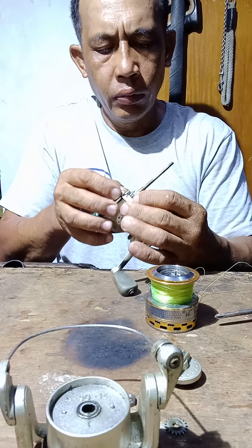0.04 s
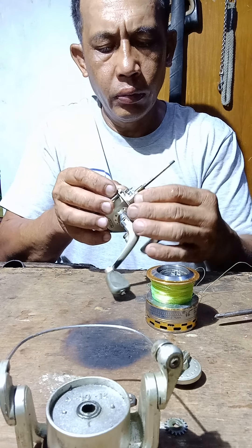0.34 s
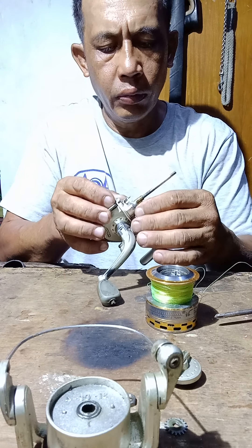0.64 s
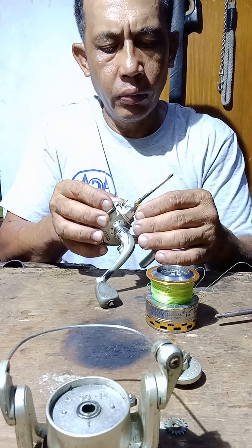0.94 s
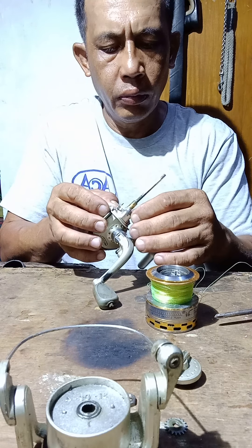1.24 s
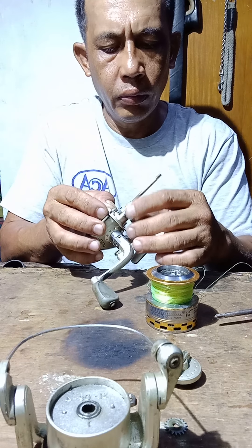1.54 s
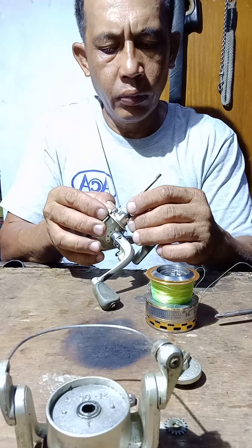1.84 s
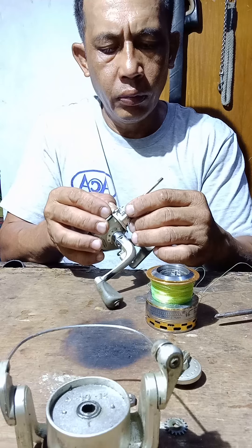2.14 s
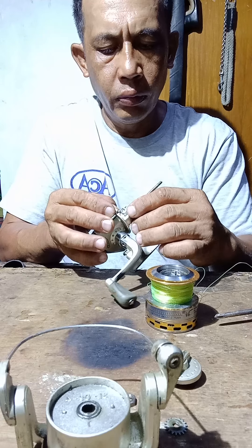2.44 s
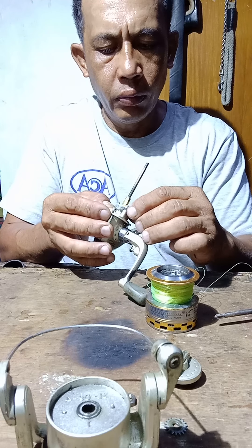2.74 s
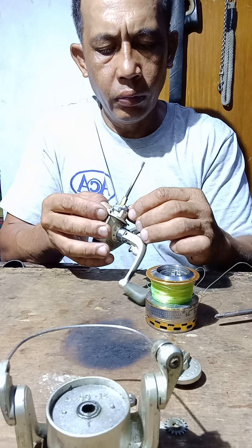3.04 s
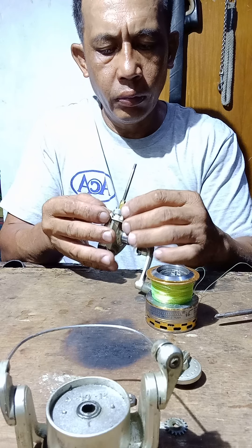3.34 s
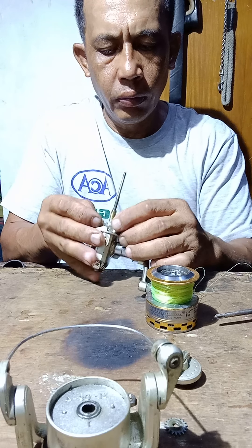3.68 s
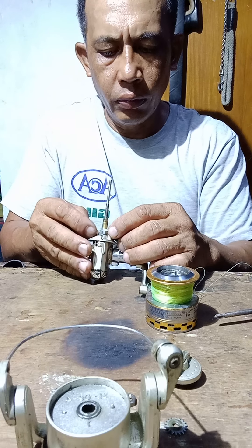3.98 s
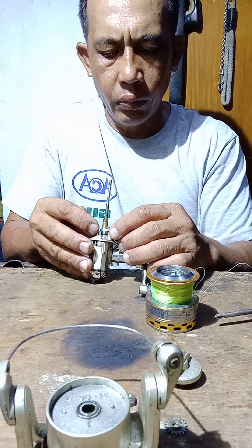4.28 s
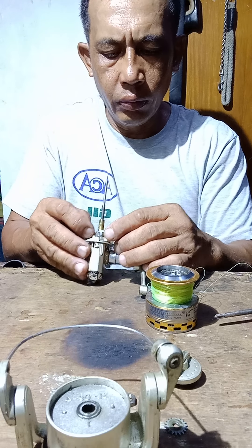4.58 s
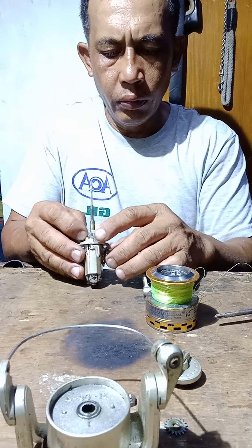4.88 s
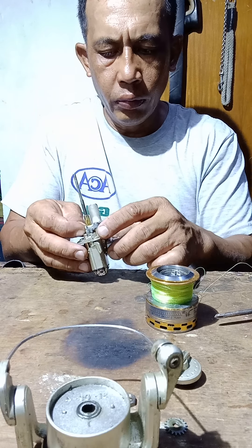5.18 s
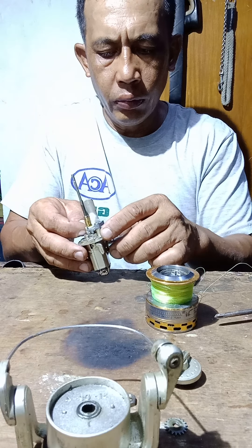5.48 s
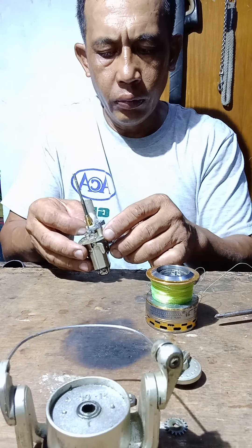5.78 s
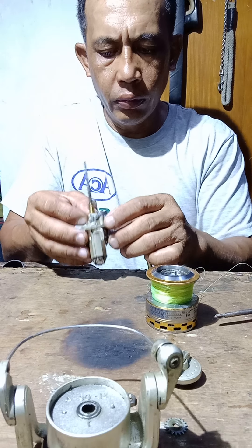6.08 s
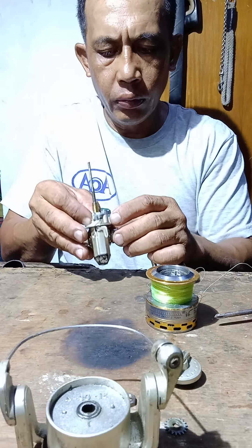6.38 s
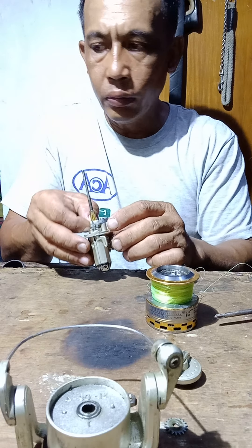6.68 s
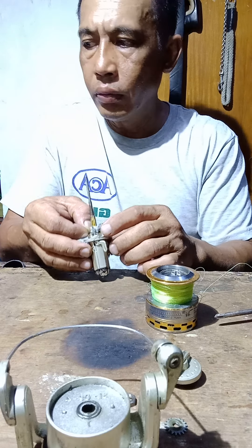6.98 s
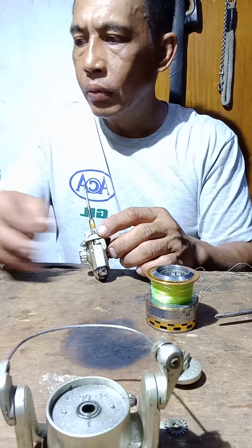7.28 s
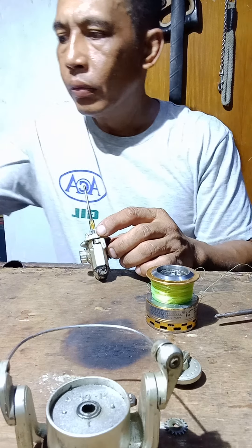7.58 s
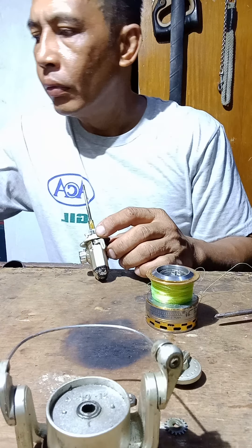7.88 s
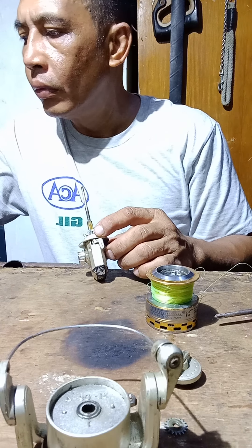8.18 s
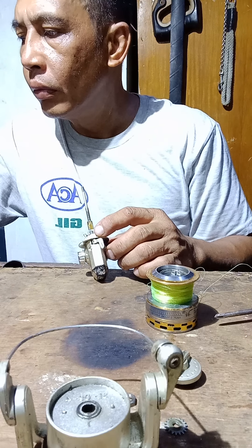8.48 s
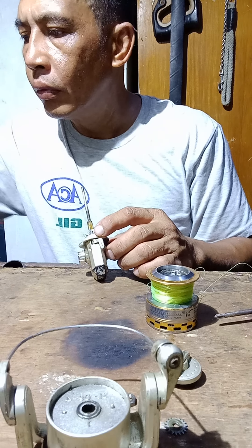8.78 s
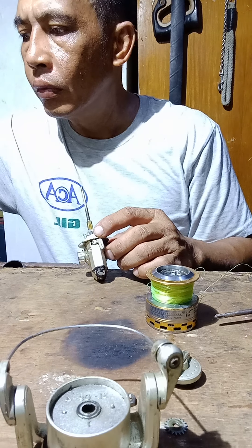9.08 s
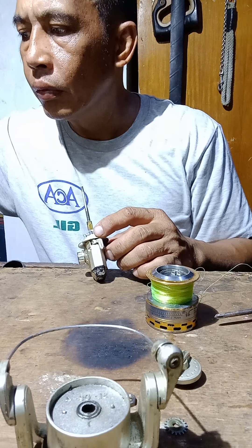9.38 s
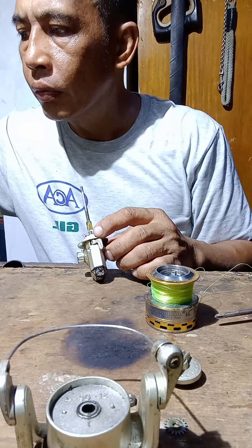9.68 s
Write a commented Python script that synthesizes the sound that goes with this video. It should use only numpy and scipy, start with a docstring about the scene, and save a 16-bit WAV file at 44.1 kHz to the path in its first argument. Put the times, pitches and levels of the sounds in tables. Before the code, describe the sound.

Two crickets, one near and high, one fainter and lower, chirp about nine times a second throughout, over a faint low night murmur on a half-open porch. From the start, fingers softly rub a hollow fishing reel, with slight table bumps and a dull forearm brush around 0.6 seconds. The rubbing grows after 3 seconds. At 3.8 seconds the reel skids briefly and lands with a hard knock that makes the wooden table ring. A softer thud follows at 4.6 seconds, more rubbing near 5, and another bump at 7.1. At 7.7 seconds a tool knocks in a box slightly to the left, and a hand rustles quietly inside. From 9.2 seconds to about 9.7, tools clatter, drag and scrape loudly, shaking the box. The sound is close, heard by a phone on the table.

```python
"""On a half-open porch, over a low night-time murmur, two crickets chirp throughout by stridulation.
From the first moment a man's fingers rub a fishing reel, exciting its hollow housing; it bumps the
wooden table, and his forearm brushes the edge. Near 3.8 s the reel skids and lands hard, and the table
rings in its normal modes. From 7.7 s he gropes in a box of tools, which knock and, after 9 s, drag
and scrape. A phone on the table hears it all and lowers its gain after loud peaks."""
import sys
import numpy as np
from scipy import signal
from scipy.fft import rfft, irfft, next_fast_len
from scipy.io import wavfile
from scipy.ndimage import uniform_filter1d, minimum_filter1d, map_coordinates

SR = 44100
rng = np.random.default_rng(int(sys.argv[2]) if len(sys.argv) > 2 else 0)


def unload_audio(sound):
    """Save the sound as a 16-bit wav file, at the path given as the first command line argument."""
    columns = np.transpose(np.atleast_2d(sound))
    # keep every value between -1 and 1, then stretch to whole-number steps
    steps = np.round(np.clip(columns, -1, 1) * 32767)
    wavfile.write(sys.argv[1], SR, steps.astype(np.int16))


N = 429093
T = np.arange(N) / SR

# Levels are relative; a spectrum gives only the shape of a noise.
# spectrum of the distant murmur: frequency_hz, density_db
NIGHT_SPECTRUM = [(25, -15), (50, -9), (90, 5.5), (140, -2), (240, 2.5), (400, -10), (700, -20),
                  (1100, -26.5), (1600, -34.5), (3000, -29.5), (4600, -36.5), (8500, -46.5), (15000, -43.5)]
# each cricket's pace, about nine chirps a second with slight hesitations: time_s, chirp_count
NEAR_PACE = [(.008, 0), (.672, 6), (1.416, 13), (2.534, 23), (3.504, 32), (4.499, 41), (6.332, 58),
             (6.56, 60), (7.425, 68), (7.843, 72), (8.176, 75), (8.417, 77), (8.57, 78), (9.308, 85),
             (9.54, 87), (9.75, 89)]
FAR_PACE = [(.08, 0), (1.91, 16), (2.39, 20), (3.29, 28), (4.31, 37), (5.68, 49), (7.04, 61), (8.83, 77),
            (9.73, 85)]
# wing strokes of one chirp, timed from its middle: offset_s, length_s, start_hz, end_hz, level_db
NEAR_STROKES = [(-.045, .019, 6800, 6450, -15), (-.030, .025, 7100, 6500, -5.5),
                (-.011, .020, 7250, 6400, 0), (.003, .025, 7050, 6500, -9)]
FAR_STROKES = [(-.040, .016, 5900, 5500, -12), (-.025, .016, 5900, 5450, -5), (-.009, .016, 5950, 5400, 0),
               (.006, .016, 5850, 5400, -3)]
# radiation from the wings, favouring the tone and its octave: frequency_hz, gain_db
WING_RESPONSE = [(4600, -2.5), (5400, -2), (7500, -1.5), (8400, -10), (9700, -11.5), (11000, 8.5),
                 (12700, 1), (14100, -6.5), (15000, -21.5)]
# fingers sliding on the reel: start_s, length_s, hiss_db, ring_db
FINGER_RUBS = [(.043, .15, -72, -71), (0.544, 0.16, -71.5, -76), (1.44, .19, -72.5, -97),
               (1.877, 0.16, -99, -64.5), (2.526, 0.24, -65.5, -72.5), (2.873, 0.33, -69, -72.5),
               (3.191, 0.12, -57, -56.5), (3.266, 0.176, -62.5, -58), (3.687, 0.18, -52.5, -55.5),
               (4.839, .13, -55, -49.5), (4.954, 0.13, -59, -51), (5.579, 0.23, -70, -77),
               (6.93, 0.15, -89, -69.5), (7.278, 0.093, -57, -66)]
# spectra of the fingers' hiss and the reel's hollow housing: frequency_hz, density_db
HISS_SPECTRUM = [(500, -9), (1000, -4.5), (1400, -15.5), (1850, -2.5), (2250, -13), (3150, 1), (3700, -5.5),
                 (4400, -3.5), (5000, -9.5), (8500, -15.5), (11500, -12), (15500, -20.5)]
HOUSING_SPECTRUM = [(500, -19), (800, -5), (1000, 5.5), (1180, -12.5), (1500, -19.5), (1830, -11.5),
                    (2150, -29.5), (3100, -17.5), (5200, -35)]
# reel and hands striking the table: start_s, level_db, highpass_hz, lowpass_hz
TABLE_BUMPS = [(.074, -41.5, 69, 288), (.569, -34, 59, 169), (3.8015, -4.5, 79.8, 1998),
               (4.578, -30, 71, 131), (4.592, -24, 96.5, 160), (7.069, -27, 474, 474),
               (7.070, -23.5, 85, 138)]
# modes of the table top, with the reel's thin metal ping above: pitch_hz, level_db, t60_s
TABLE_MODES = [(84.2, -6.5, 0.19), (137, 0.5, 0.21), (219.6, -8, 0.29), (247.5, -9, 0.28), (287, -7, 0.22),
               (372, -3, 0.16), (407, 0, 0.12), (467, 3, 0.11), (624, -6, 0.092), (770, -11, 0.15),
               (940, -7.5, 0.069), (1247.6, -4.5, 0.061), (1430, 0.5, 0.048), (1860, -9.5, 0.052),
               (5510, -11, .05), (11470, -4.5, 0.33)]
# the table's dense modes and the porch around it: frequency_hz, density_db, t60_s
TABLE_TAIL = [(49.73, -5.5, .35), (120, 1, 0.52), (340, -4.5, 0.37), (690, -4.5, 0.17), (1280, -1, 0.098),
              (2200, -12, 0.17), (3100, -16, 0.22), (5000, -9, .11), (7600, -15.5, .16), (15130, -3.5, 0.4)]
# a forearm brushing the table's edge: start_s, length_s, level_db
ARM_BRUSHES = [(.6, 0.51, -51.5), (1.3, 0.45, -60.5), (4.86, 0.076, -45), (7.26, 0.13, -53),
               (7.95, 0.38, -54.5)]
# the reel skidding as it is set down: start_s, length_s, level_db
REEL_SKIDS = [(3.738, .055, -40.5), (4.565, 0.1, -49.5)]
# spectra of the brushing and the skidding: frequency_hz, density_db
BRUSH_SPECTRUM = [(50, -10), (110, 8.5), (240, 9.5), (450, -8.5), (900, -53)]
SKID_SPECTRUM = [(400, -5), (900, -1), (1500, 0), (2200, -7), (3200, -16), (5000, -18), (9000, -30)]
# the hand feeling about in the box: start_s, length_s, level_db
GROPES = [(7.7, 0.3, -65.5), (7.93, 0.75, -60)]
# spectrum of its friction: frequency_hz, density_db
GROPE_SPECTRUM = [(500, -4.5), (950, 7), (1500, -8.5), (2400, -6), (3200, 2.5), (4000, -6.5), (5600, -2.5),
                  (8500, -7), (11400, -2), (12500, -7), (15500, -14)]
# tools striking the box: start_s, level_db, lowpass_hz
TOOL_KNOCKS = [(7.7301, -20.5, 930), (9.209, -28.5, 2530), (9.280, -6.5, 1142), (9.319, -14.5, 1990),
               (9.329, -5, 304), (9.361, -6, 378), (9.373, -3, 345), (9.431, -17, 1400), (9.5007, -5, 1110),
               (9.540, -6, 1940), (9.678, -3.5, 790)]
# modes of the box: pitch_hz, level_db, t60_s
BOX_MODES = [(240, -10, 0.18), (306.4, -5, 0.075), (354, -38, 0.058), (522, 0, 0.043), (510.6, 6, 0.041),
             (853, -12.5, 0.014), (1204, -1, 0.024), (2100, -10.5, 0.083), (2432, -11.5, 0.05),
             (3054, -15.5, 0.053)]
# the box's dense modes and the porch around it: frequency_hz, density_db, t60_s
BOX_TAIL = [(59.7, -34, .2), (161, 11, 0.069), (317, 13.5, 0.24), (555, 4.5, 0.28), (830, 5.5, 0.17),
            (1170, -3, 0.25), (2310, 1.5, 0.17), (5300, -4.5, 0.29), (9000, -1, 0.18),
            (14800, -12.5, 0.069)]
# envelopes of tools dragged in the box: time_s, rumble_db, scrape_db
DRAG_LEVELS = [(9.169, -59, -76), (9.191, -36, -59), (9.269, -32, -47), (9.285, -22, -30.5),
               (9.335, -18.5, -34.5), (9.40, -24.5, -42), (9.46, -30, -42.5), (9.57, -28, -45),
               (9.62, -32.5, -51.5), (9.73, -34, -54)]
# spectra of the shaken box and the scraping tools: frequency_hz, density_db
RUMBLE_SPECTRUM = [(30, -27), (90, -2), (170, -9.5), (280, 3), (520, -4), (750, -13.5), (1300, -16.5),
                   (2500, -42.5)]
SCRAPE_SPECTRUM = [(500, -5), (1200, -3.5), (2500, 3), (4000, -11), (8500, -14), (12000, -13.5),
                   (15500, -11.5)]
# share of the sound that differs between the two microphones: frequency_hz, side_minus_mid_db
STEREO_WIDTH = [(100, -11.5), (280, -18.5), (600, -6), (1300, 0.5), (4000, -0.5), (15000, 1.5)]
# the left microphone, shaded in the middle range, favoured at the top: frequency_hz, left_minus_right_db
MIC_SHADING = [(60, -1), (250, -4), (550, -5.5), (1100, -8), (2000, -5), (3500, -9.5), (5600, -14),
               (6800, -9), (8000, -1.5), (9500, 4), (14000, 3)]


def undb(db):
    """Amplitude ratio for a level in decibels."""
    return 10 ** (np.asarray(db) / 20)


def unit(x):
    """Normalisation to an RMS of one."""
    return x / np.sqrt(np.mean(x ** 2))


def pan(db):
    """Left and right gains for a level difference."""
    return undb(np.array([[db], [-db]]) / 2)


def on_log(hz, points, column=1):
    """Interpolation of a table column along a log-frequency axis."""
    points = np.array(points, float)
    return np.interp(np.log(np.maximum(hz, 1)), np.log(points[:, 0]), points[:, column])


def colour(x, spectrum):
    """Filtering by multiplication in the frequency domain."""
    n = x.shape[-1]
    size = next_fast_len(n)
    gain = undb(on_log(np.fft.rfftfreq(size, 1 / SR), spectrum))
    return irfft(rfft(x, size) * gain, size)[..., :n]


def butterworth(x, hz, kind):
    """A filter with a maximally flat passband."""
    return signal.sosfilt(signal.butter(2, hz, kind, fs=SR, output="sos"), x)


def stereo_noise(n):
    """Spatial coherence: noise is alike on both sides in the bass and unrelated in the treble."""
    mid, side = rng.standard_normal((2, n))
    side = colour(side, STEREO_WIDTH)
    return np.array([mid + side, mid - side])


def walk(rate_hz, n=N):
    """Smooth random fluctuation with a spread near one."""
    knots = rng.standard_normal(int(n / SR * rate_hz) + 2)
    return map_coordinates(knots, [np.arange(n) * rate_hz / SR], order=2, mode="nearest")


def add(out, x, start_s):
    """Superposition of x on out from start_s on."""
    i = int(start_s * SR)
    a, b = max(i, 0), min(i + x.shape[-1], out.shape[-1])
    if b > a:
        out[..., a:b] += x[..., a - i:b - i]


def night_murmur():
    """Slow amplitude modulation makes a low, distant noise swell gently."""
    return undb(-58 + 1.1 * walk(2.7)) * unit(colour(stereo_noise(N), NIGHT_SPECTRUM)) * pan(-.8)


def stridulation(pace, strokes, scatter_db, teeth_rad, jitter_rad, octave_db):
    """Each wing stroke drags a scraper over a file: a falling tone, phase-modulated by uneven teeth."""
    time_s, count = np.transpose(pace)
    chirps_s = np.interp(np.arange(count[-1] + 1), count, time_s)
    chirps_db = scatter_db * rng.standard_normal(len(chirps_s))
    out = np.zeros(N)
    for offset_s, length_s, start_hz, end_hz, level_db in strokes:
        n = int(length_s * SR)
        glide = 2 * np.pi * np.cumsum(np.linspace(start_hz, end_hz, n)) / SR
        glide += teeth_rad * walk(960, n)  # the same teeth in every chirp
        swell = np.sin(np.linspace(0, np.pi, n))
        for chirp_s, chirp_db in zip(chirps_s, chirps_db):
            # no two strokes catch the file at quite the same moment or speed
            phase = glide + .8 * rng.standard_normal() + jitter_rad * walk(1200, n)
            tone = np.sin(phase) + undb(octave_db) * np.sin(2 * phase + 1.7 * walk(860, n))
            start_s = (int(chirp_s * SR) + int(offset_s * SR) + .5) / SR
            add(out, undb(chirp_db + level_db) * swell * tone, start_s)
    return colour(out, WING_RESPONSE)


def porch(x, wet_db, t60_s, wall_db):
    """Reflection: a slap off the nearest wall, then different diffuse echoes at each microphone."""
    wall_lag = int(.01017 * SR)
    early = x + undb(wall_db) * np.pad(x, (wall_lag, 0))[:N]
    t = T[:SR // 2]
    echoes = rng.standard_normal((2, len(t))) * undb(-60 * t / t60_s)
    wet = signal.fftconvolve(early[None], echoes, axes=1)[:, :N]
    return unit(unit(early) + undb(wet_db) * np.array([unit(side) for side in wet]))


def crickets():
    """Independent rhythms: a near, high cricket and a fainter, lower one drift in and out of step."""
    near = stridulation(NEAR_PACE, NEAR_STROKES,
                        scatter_db=.5, teeth_rad=.41, jitter_rad=.55, octave_db=-28.5)
    near = porch(near, wet_db=1, t60_s=.37, wall_db=-10.5)
    far = stridulation(FAR_PACE, FAR_STROKES,
                       scatter_db=2.1, teeth_rad=.25, jitter_rad=.35, octave_db=-28)
    far = porch(far, wet_db=0, t60_s=.25, wall_db=-14)
    return (undb(-47.5) * near + undb(-65) * far) * pan(.4)


def friction(spectrum, rate_hz, rough_db):
    """Stick-slip friction: surfaces catch and release, giving noise in uneven spurts."""
    return unit(colour(stereo_noise(N) * undb(rough_db * walk(rate_hz)), spectrum))


def slides(events, spectrum, rough_db):
    """Friction noise swells and fades with the contact pressure of each short movement."""
    pressure = sum(undb(level_db) * np.sin(np.pi * np.clip((T - start_s) / length_s, 0, 1))
                   for start_s, length_s, level_db in events)
    return pressure * friction(spectrum, rate_hz=180, rough_db=rough_db)


def finger_rubs():
    """Resonance: fingertips hiss over the reel's metal and excite its hollow housing."""
    start_s, length_s, hiss_db, ring_db = np.transpose(FINGER_RUBS)
    hiss = slides(zip(start_s, length_s, hiss_db), HISS_SPECTRUM, rough_db=2.5)
    ring = slides(zip(start_s, length_s, ring_db), HOUSING_SPECTRUM, rough_db=3.5)
    return hiss + ring


def struck_body(modes, tail, tail_db, crack_db, crack_t60_s):
    """Impulse response: a short crack, damped modes and a tail with its own decay in each band."""
    t, ring = T[:SR // 3], 0
    for hz, level_db, t60_s in modes:
        # treble modes reach the two microphones further out of phase than bass modes
        skew = np.arctan(undb(on_log(hz, STEREO_WIDTH))) * rng.choice([-1, 1]) * np.array([[1], [-1]])
        sign = rng.choice([-1, 1])  # set by the spot that is struck
        ring = ring + sign * undb(level_db - 60 * t / t60_s) * np.sin(2 * np.pi * hz * t + skew)
    noise, wash = stereo_noise(len(t)), 0
    for hz in 50 * 2 ** np.arange(0, 8.5, .5):  # half-octave bands
        band = butterworth(noise, [hz / 2 ** .25, hz * 2 ** .25], "band")
        wash = wash + band * undb(on_log(hz, tail) - 60 * t / on_log(hz, tail, column=2))
    crack = colour(stereo_noise(len(t)), tail) * undb(-60 * t / crack_t60_s)
    return unit(ring) + undb(tail_db) * unit(wash) + undb(crack_db) * unit(crack)


def impacts(events, modes, tail, tail_db, crack_db, crack_t60_s):
    """Impact excitation: a light object leaves the low modes quiet, a soft contact the high ones."""
    out = np.zeros((2, N))
    crest_db = 6  # allowance for the peak above the loudest short-term RMS
    for start_s, level_db, highpass_hz, lowpass_hz in events:
        hit = struck_body(modes, tail, tail_db, crack_db, crack_t60_s)
        hit = butterworth(hit, lowpass_hz, "low")
        hit = butterworth(hit, highpass_hz, "high")
        loudest_rms = np.sqrt(uniform_filter1d(np.mean(hit ** 2, axis=0), size=512).max())
        add(out, hit / loudest_rms * undb(level_db - crest_db), start_s)
    return out


def table_bumps():
    """Free vibration: struck by reel or hand, the table top rings in its normal modes."""
    return impacts(TABLE_BUMPS, TABLE_MODES, TABLE_TAIL, tail_db=4, crack_db=6, crack_t60_s=.03)


def forearm_brushes():
    """Sliding friction of a forearm on the table's edge gives a dull, smooth noise."""
    return slides(ARM_BRUSHES, BRUSH_SPECTRUM, rough_db=1)


def reel_skids():
    """Sliding friction of the reel on wood gives a brief mid-range scuff."""
    return slides(REEL_SKIDS, SKID_SPECTRUM, rough_db=2.5)


def groping():
    """Quick to-and-fro strokes of the hand in the box modulate the amplitude of its friction noise."""
    period_s, peak_s, swing_db = .118, 8.065, 3.5
    strokes = undb(swing_db * np.cos(2 * np.pi * (T - peak_s) / period_s))
    return strokes * slides(GROPES, GROPE_SPECTRUM, rough_db=2)


def tool_knocks():
    """Elastic collision: each tool strikes the box and rebounds once."""
    rebound_s, rebound_db, octaves_per_db = .0055, -8, .042
    contacts = []
    for start_s, level_db, lowpass_hz in TOOL_KNOCKS:
        # the lighter the tool, the quieter and brighter its knock and the weaker the low modes
        highpass_hz = 283 * (lowpass_hz / 1000) ** .33 * 2 ** (-level_db * octaves_per_db)
        contacts.append((start_s, level_db, highpass_hz, lowpass_hz))
        contacts.append((start_s + rebound_s, level_db + rebound_db, highpass_hz, lowpass_hz))
    return impacts(contacts, BOX_MODES, BOX_TAIL, tail_db=-1, crack_db=-3.5, crack_t60_s=.031)


def tool_drag():
    """Forced vibration: dragged tools shake the box as they scrape over each other."""
    time_s, rumble_db, scrape_db = np.transpose(DRAG_LEVELS)
    rumble = friction(RUMBLE_SPECTRUM, rate_hz=90, rough_db=3.5)
    rumble *= undb(np.interp(T, time_s, rumble_db, left=-120))
    scrape = friction(SCRAPE_SPECTRUM, rate_hz=400, rough_db=6.5)
    scrape *= undb(np.interp(T, time_s, scrape_db, left=-120))
    return rumble + scrape


def scene():
    """Linear superposition: the pressures of all sources add, with the box slightly to the left."""
    table_and_crickets = table_bumps() + crickets()
    handling = finger_rubs() + reel_skids() + forearm_brushes()
    toolbox = (groping() + tool_drag() + tool_knocks()) * pan(.91)
    return table_and_crickets + handling + toolbox + night_murmur()


def gain_control(x, threshold_db=-12.5, max_cut_db=2.5, hold_s=1.03, ramp_s=.33):
    """Compression: after a peak above the threshold the gain sinks, holds and recovers."""
    peak_db = 20 * np.log10(np.abs(x).max(axis=0) + 1e-9)
    cut_db = np.clip(peak_db - threshold_db, 0, max_cut_db)
    hold, ramp = int(hold_s * SR), int(ramp_s * SR)
    held_db = minimum_filter1d(-cut_db, hold, origin=(hold - 1) // 2, mode="constant")
    return x * undb(uniform_filter1d(held_db, ramp, origin=(ramp - 1) // 2, mode="constant"))


def record(dry):
    """Transduction: the phone colours each microphone differently, compresses, clips and cuts the top."""
    shaded = np.array([colour(channel, [(hz, side * db / 2) for hz, db in MIC_SHADING])
                       for channel, side in zip(dry, (1, -1))])
    clipped = np.clip(gain_control(shaded), -1, 1)
    cutoff_hz = 15800
    return signal.sosfilt(signal.ellip(8, .2, 80, cutoff_hz, fs=SR, output="sos"), clipped)


dry = scene()
out = record(dry)
unload_audio(out)
```